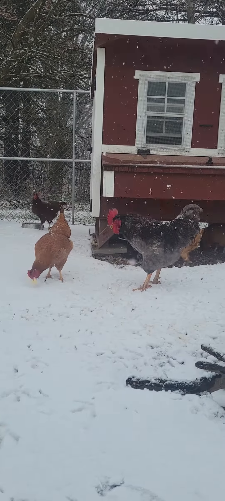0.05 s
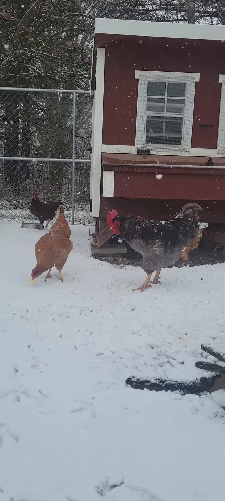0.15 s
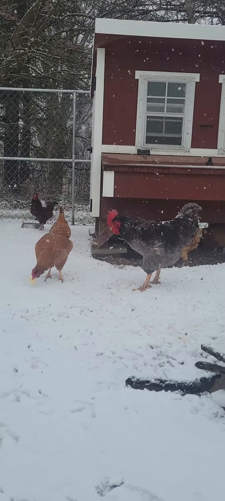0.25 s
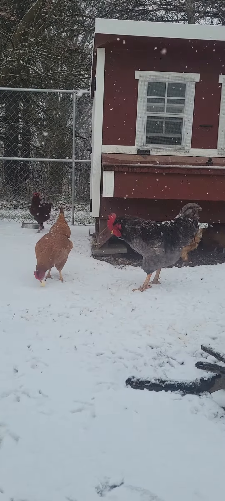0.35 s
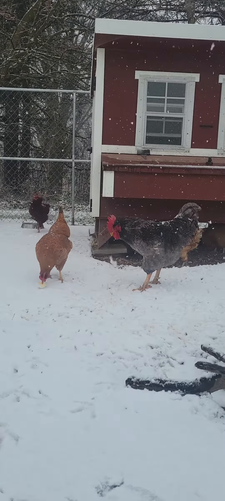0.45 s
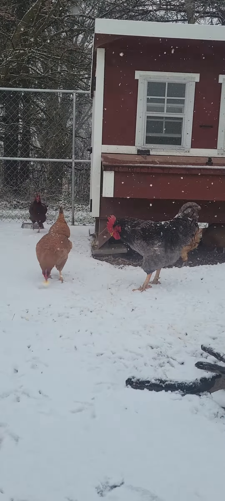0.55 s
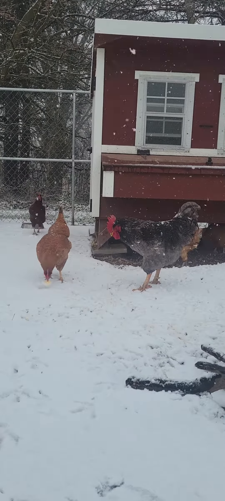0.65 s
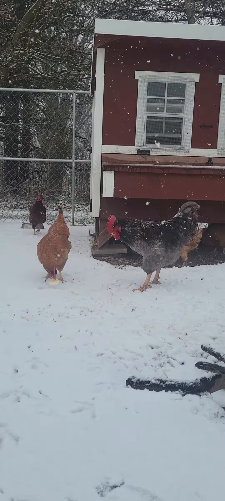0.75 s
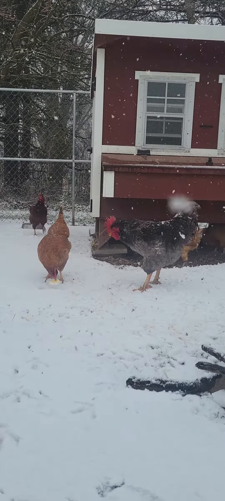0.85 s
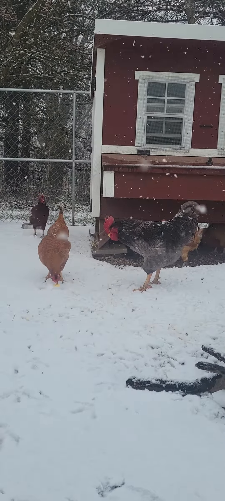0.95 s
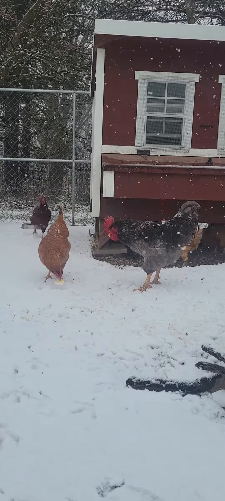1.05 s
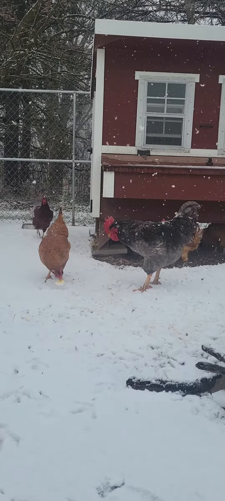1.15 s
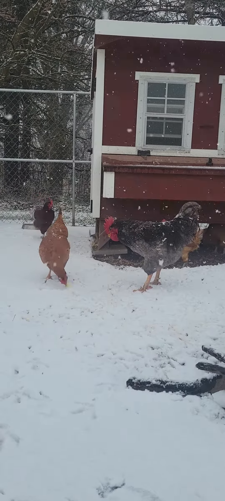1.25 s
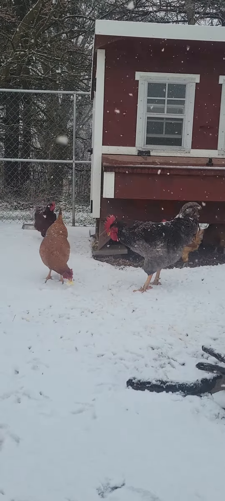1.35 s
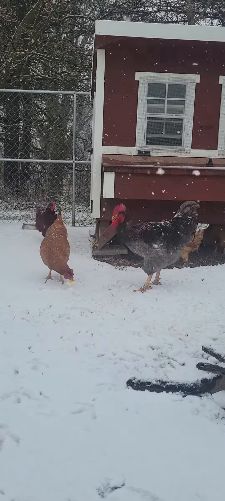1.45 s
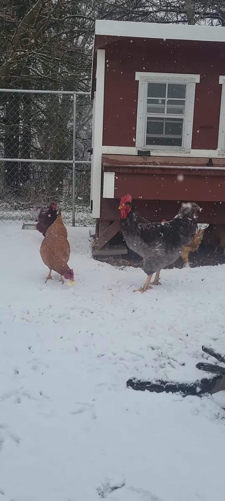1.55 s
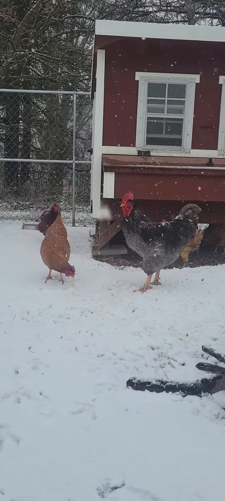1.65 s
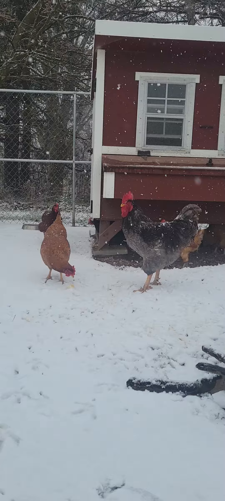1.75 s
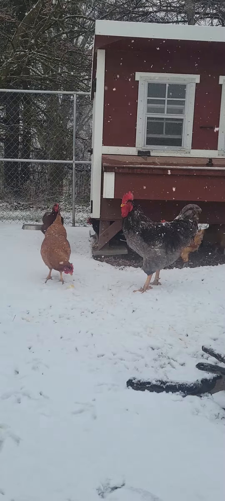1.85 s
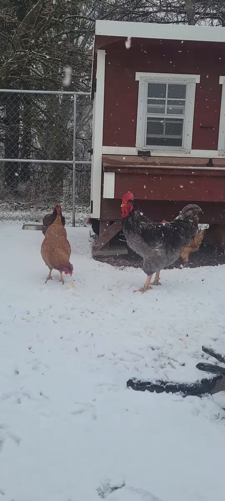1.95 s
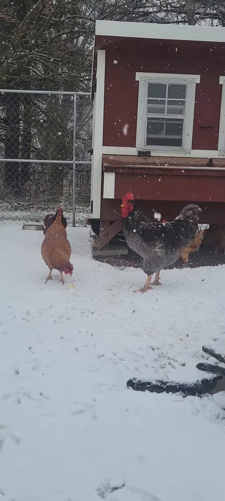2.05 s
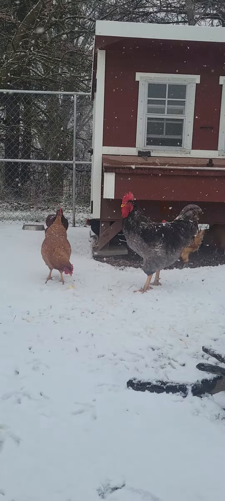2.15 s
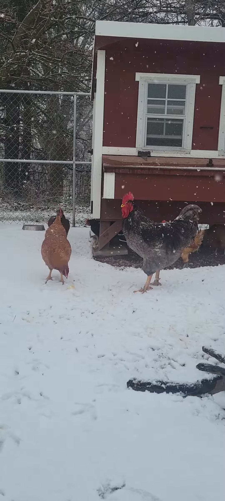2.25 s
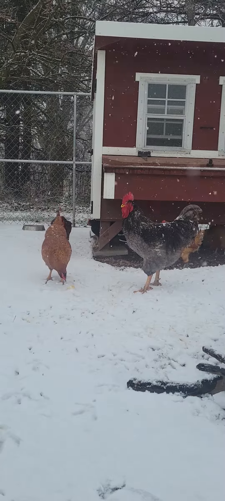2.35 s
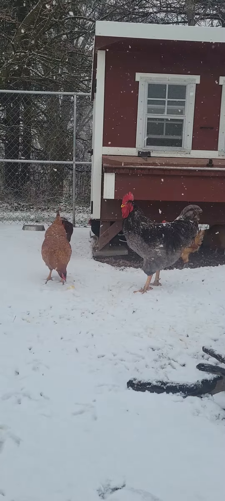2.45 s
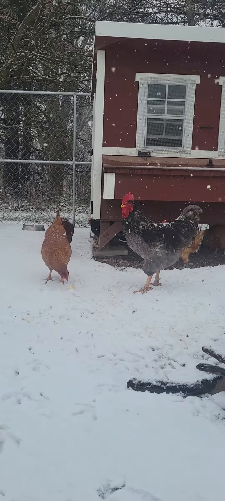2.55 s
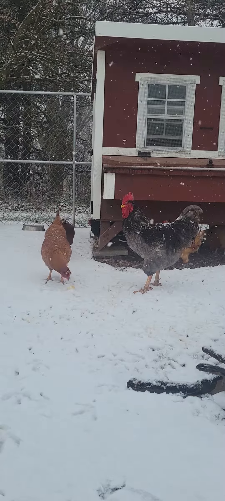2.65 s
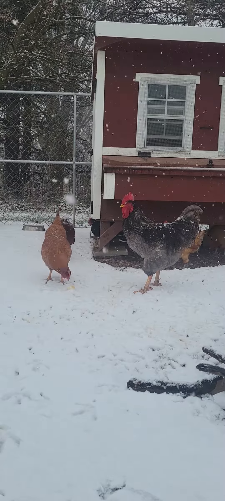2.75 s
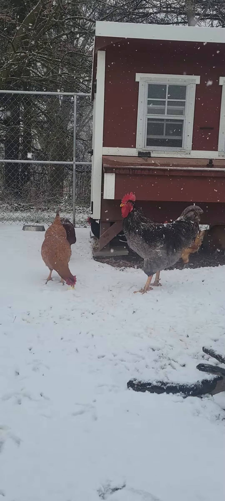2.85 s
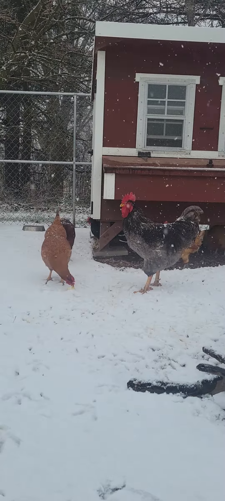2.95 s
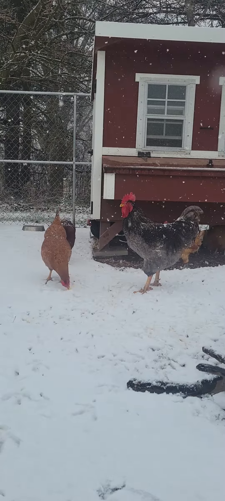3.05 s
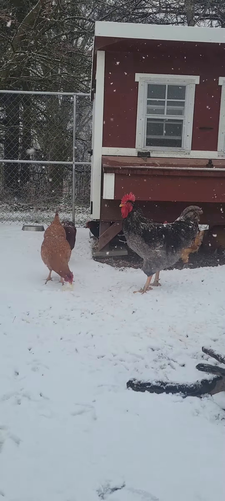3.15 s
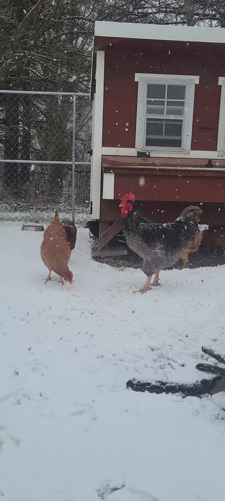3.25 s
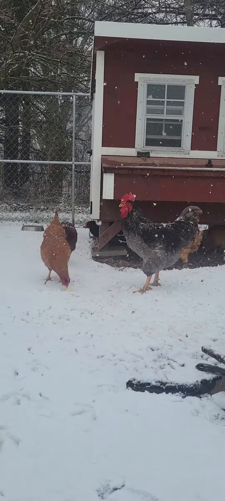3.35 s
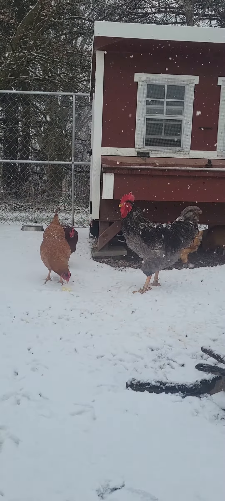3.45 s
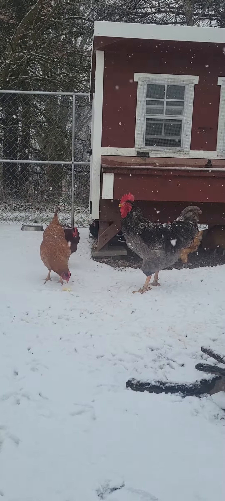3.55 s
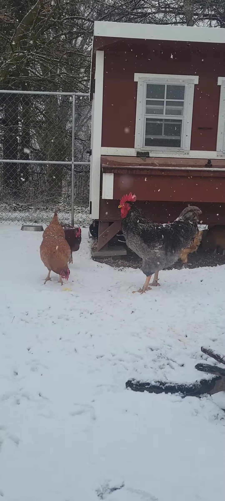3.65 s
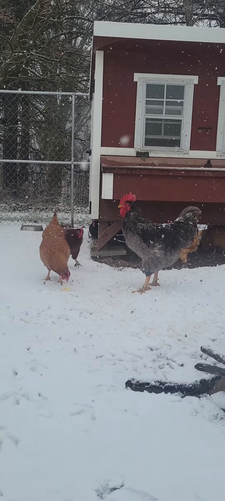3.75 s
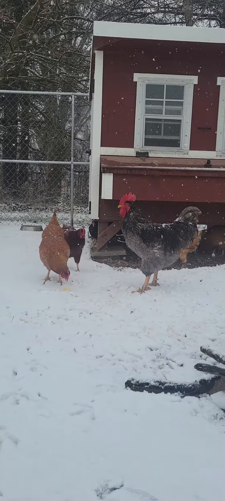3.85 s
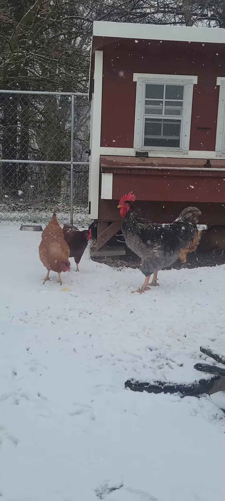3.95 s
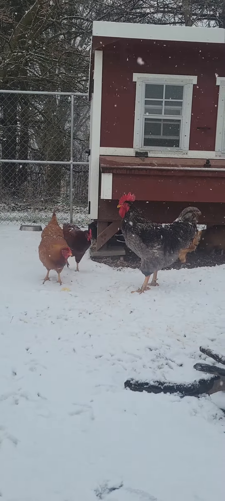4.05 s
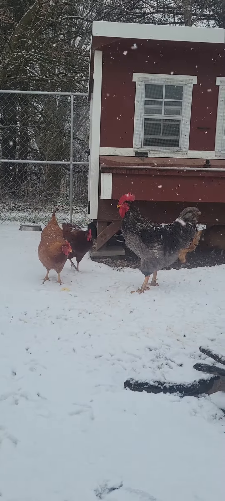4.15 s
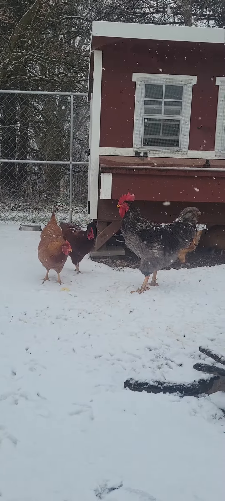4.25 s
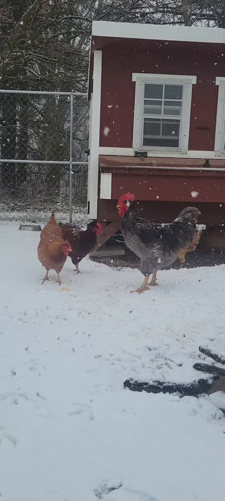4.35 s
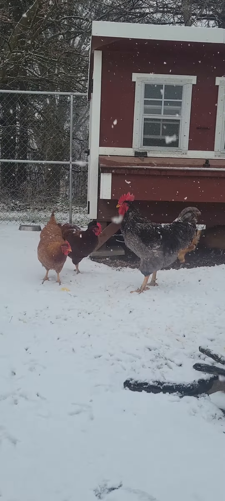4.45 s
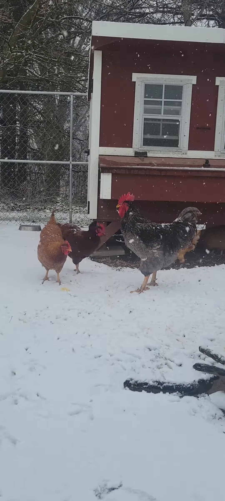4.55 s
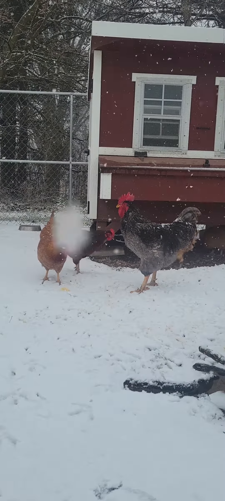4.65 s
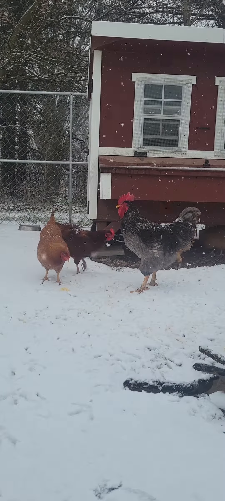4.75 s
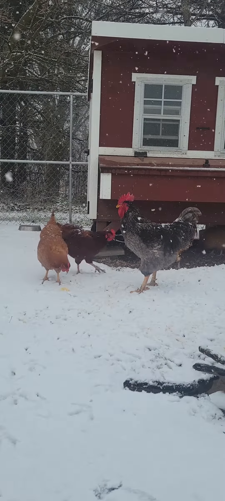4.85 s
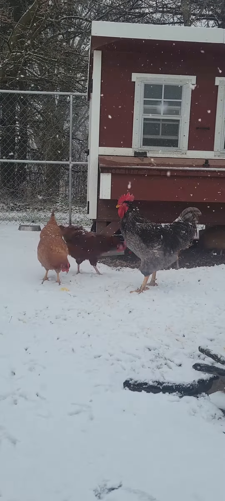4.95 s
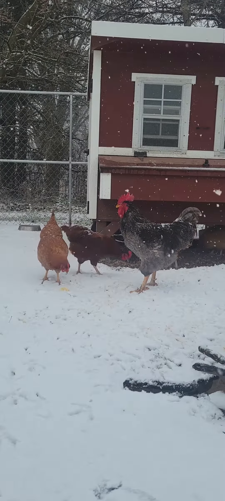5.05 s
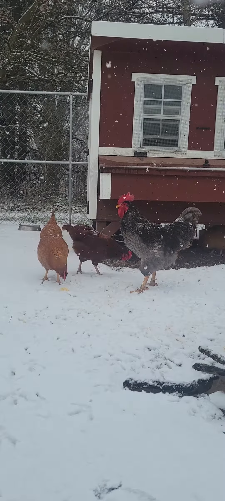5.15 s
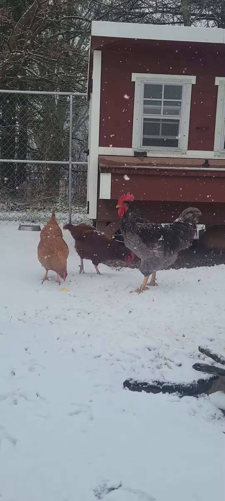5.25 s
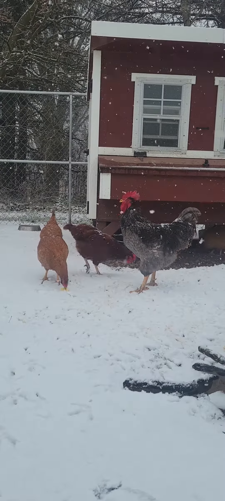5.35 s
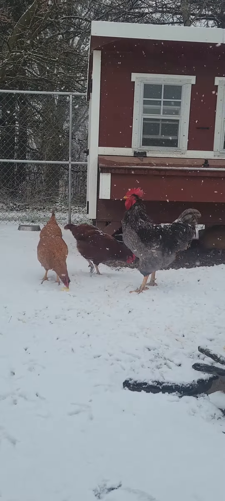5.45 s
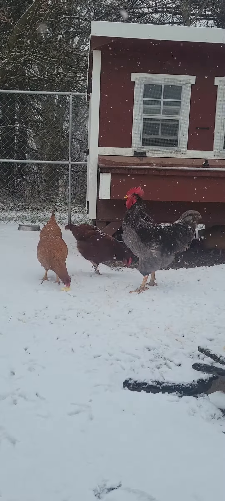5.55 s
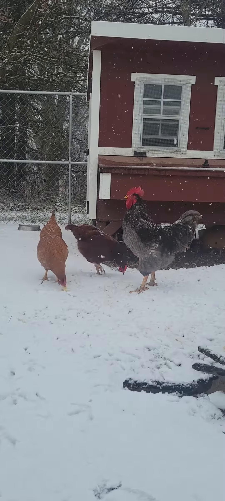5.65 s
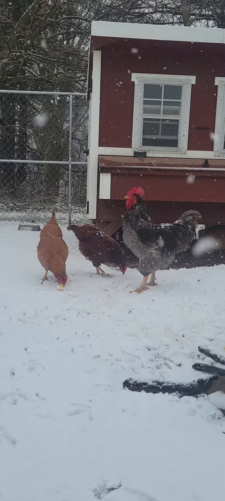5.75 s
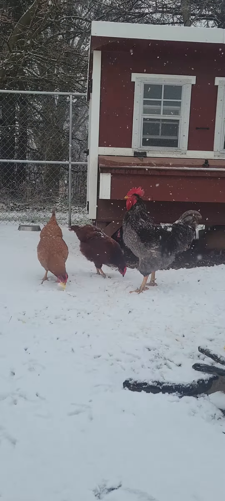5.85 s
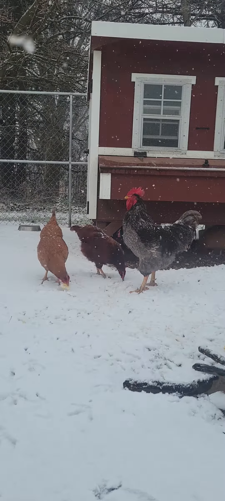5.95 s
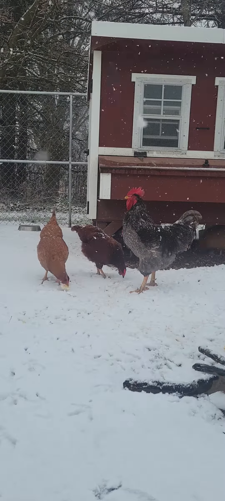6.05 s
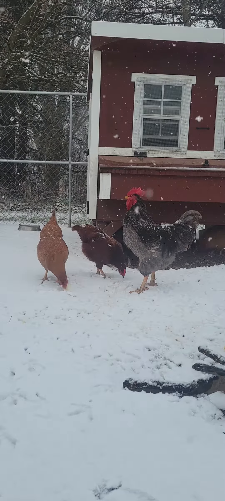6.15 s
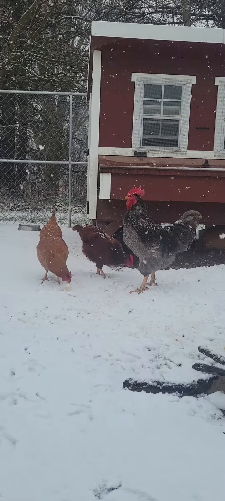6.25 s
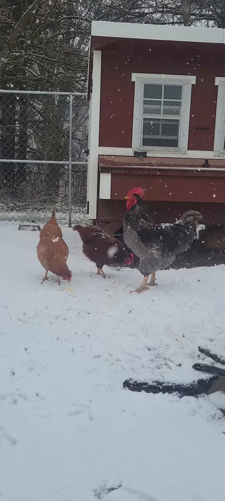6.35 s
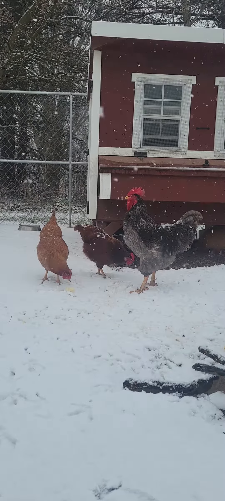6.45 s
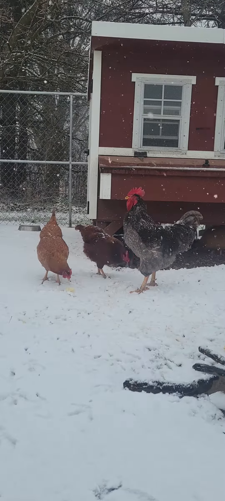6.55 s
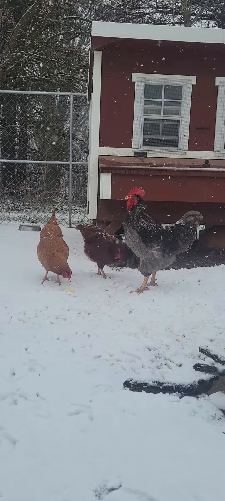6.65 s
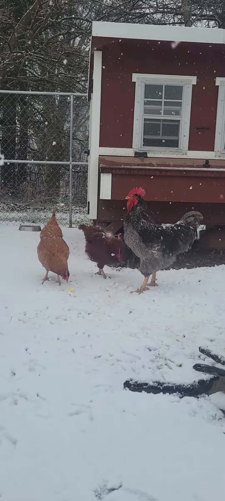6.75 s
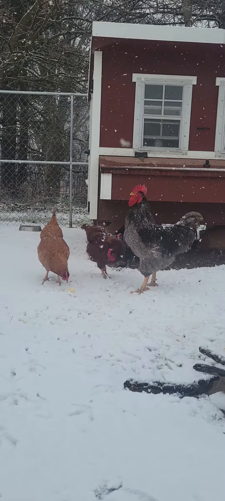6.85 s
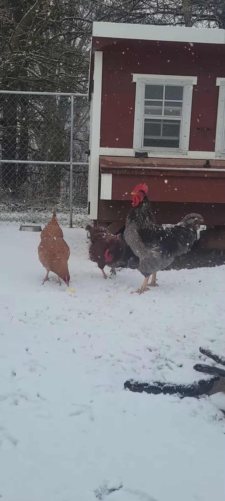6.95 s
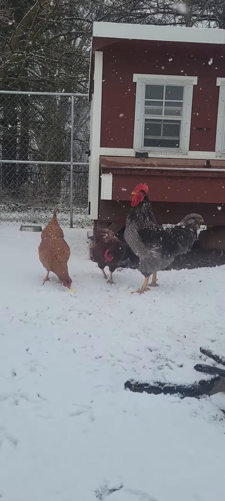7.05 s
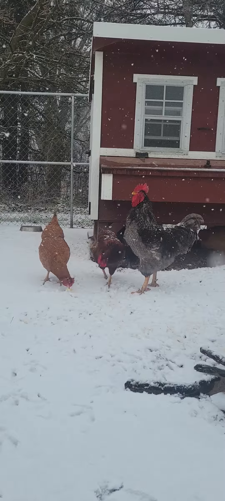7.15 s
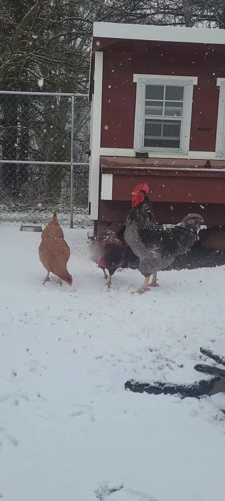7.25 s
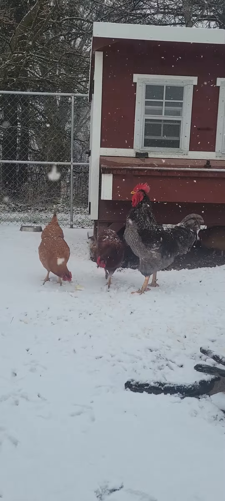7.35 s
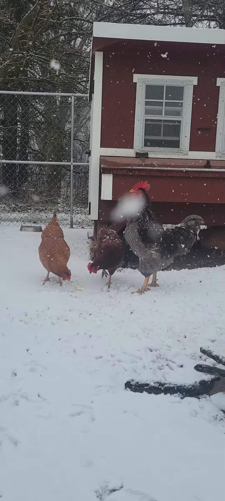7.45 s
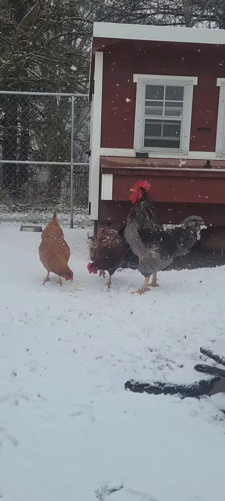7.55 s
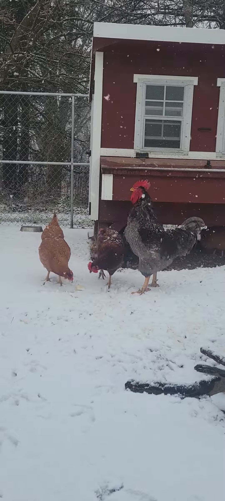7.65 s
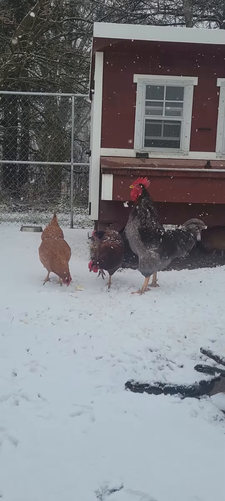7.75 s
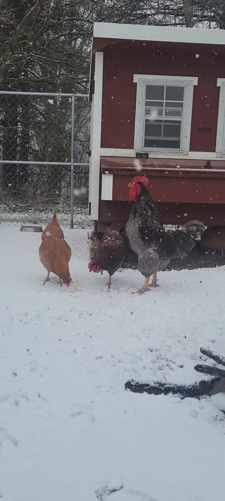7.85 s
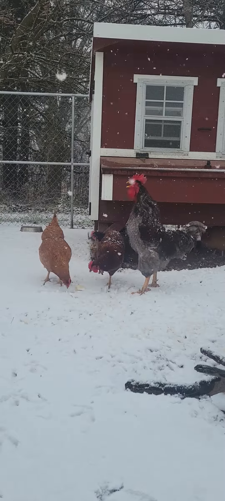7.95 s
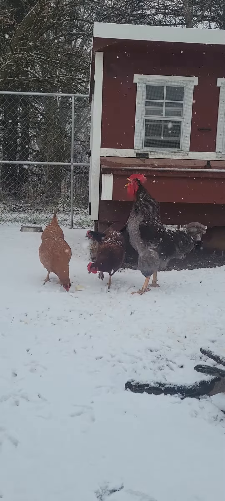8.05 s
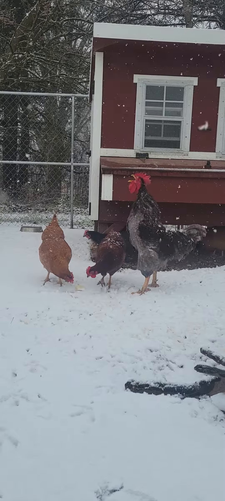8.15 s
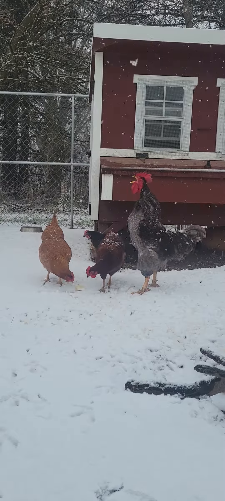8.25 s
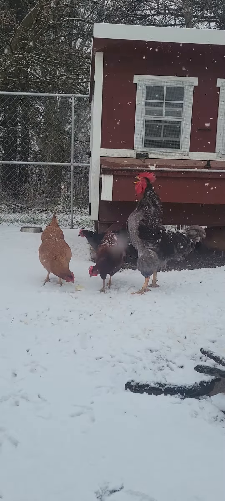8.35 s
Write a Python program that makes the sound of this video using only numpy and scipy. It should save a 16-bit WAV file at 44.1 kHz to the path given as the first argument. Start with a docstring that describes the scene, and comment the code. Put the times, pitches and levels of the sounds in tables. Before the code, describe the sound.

A quiet snowy back yard in stereo, with light low wind rumble and a faint airy hush throughout. From the start, hens nearby murmur soft, short, rounded clucks in loose runs, sinking slightly in pitch. Small birds give thin rising chips between 0.4 and 0.9 seconds, with a few more around 2 to 3. A dog far away in the woods barks hoarsely at about 0.9, 1.6, 3.5, 4.3 and 5.2 seconds, smeared by echo. Icy flakes tick crisply at random, sharpest around 2.9 and 3.3. A soft low bump hits the microphone case near 1.6, a fainter one near 4.8. A long, pure, falling bird whistle with echo sounds around 6.6 to 7.2. At 8.06 a close rooster erupts in a loud, rasping syllable about a quarter second long, jumping in pitch and clearing before stopping, with brief yard reflections.

```python
"""Snowy back yard: light wind rumbles under a faint hush (shaped noise) while icy flakes tick (noise bursts).
From the start hens murmur soft harmonic notes; small birds soon add near-pure rising chips, later whistles.
From 0.9 s a dog barks far off in the woods: hoarse pulses heard only through a scattered tail.
Two soft bumps on the microphone case follow: decaying sines.
At 8.06 s a rooster close by bursts into a rasping crow syllable: two coupled voices plus pulsed breath."""
import sys
import numpy as np
from scipy import signal
from scipy.fft import rfft, irfft
from scipy.io import wavfile
from scipy.ndimage import uniform_filter1d

SR = 44100
rng = np.random.default_rng(int(sys.argv[2]) if len(sys.argv) > 2 else 0)


def store_pcm(level_fs):
    """Save levels as 16-bit WAV."""
    pcm = np.round(np.clip(level_fs, -1, 1) * 32767).astype(np.int16)
    wavfile.write(sys.argv[1], SR, np.atleast_2d(pcm).T)


N = 370440


def amp(db):
    """Decibels to gain."""
    return 10 ** (np.asarray(db) / 20)


def unit_rms(x):
    """Scale to an rms of 1."""
    return x / np.sqrt(np.mean(x ** 2) + 1e-20)


def read(points, hz):
    """Interpolate a table on a log-frequency axis."""
    f, value = np.transpose(points)
    return np.interp(np.log(hz + 1), np.log(f + 1), value)


def add(mix, start_s, sound):
    """Mix a sound in from start_s, in place."""
    part = mix[..., max(round(start_s * SR), 0):][..., :sound.shape[-1]]
    part += sound[..., :part.shape[-1]]


def colour(x, points):
    """Filter by a dB spectrum."""
    count = x.shape[-1]
    gain = amp(read(points, np.fft.rfftfreq(count, 1 / SR)))
    return irfft(rfft(x) * gain, count)


def waver(count, rate_hz):
    """Smooth random curve of rms 1, rolled off above rate_hz."""
    hz = np.fft.rfftfreq(count, 1 / SR)
    lowpass = (hz > 0) / (1 + (hz / rate_hz) ** 4)
    return unit_rms(irfft(rfft(rng.standard_normal(count)) * lowpass, count))


def phase_of(hz):
    """Running phase of a pitch curve, radians."""
    return 2 * np.pi * np.cumsum(hz) / SR


def resonate(x, hz, width_hz):
    """Resonance with steep skirts: a triple complex pole."""
    r = np.exp(-np.pi * width_hz * 1.5 / SR)
    pole = r * np.exp(2j * np.pi * hz / SR)
    return signal.lfilter([(1 - r) ** 3], np.poly([pole] * 3), x).real


def scatter(x, t60_s, build_s, likeness):
    """Diffuse stereo tail from trees and walls: noise that builds up, then dies away."""
    t = np.arange(SR) / SR
    envelope = amp(-60 * t / t60_s) * (1 - np.exp(-t / build_s))
    shared, other = rng.standard_normal((2, SR)) * envelope
    c = np.clip(likeness, 0, 1)
    tail = np.array([shared, c * shared + np.sqrt(1 - c * c) * other])
    tail /= np.linalg.norm(shared)
    return signal.fftconvolve(x[None], tail, axes=1)[:, :len(x)]


# left-right likeness of diffuse noise: f/Hz, correlation [0-1]
PORT_LIKENESS = [(30, 0.71), (70, 0.99), (130, 0.98), (290, 0.74), (640, 0.59), (1410, 0.61), (3100, 0),
                 (15000, 0.08)]


def ambience(spectrum, level, patchy_db):
    """Partly shared noise at two ports, with drifting time-frequency patches, on a slow level curve."""
    frames, hz = N // 512 + 5, np.fft.rfftfreq(2048, 1 / SR)
    a, b, c, d, patches = rng.standard_normal((5, frames, len(hz)))
    patches = uniform_filter1d(patches, size=8, axis=0)
    patches = unit_rms(uniform_filter1d(patches, size=12, axis=1))
    same = np.clip(read(PORT_LIKENESS, hz), -1, 1)
    left = a + 1j * b
    right = same * left + np.sqrt(1 - same ** 2) * (c + 1j * d)
    z = np.array([left, right]) * amp(read(spectrum, hz) + patchy_db * patches)
    noise = signal.istft(z.transpose(0, 2, 1), nperseg=2048, noverlap=1536)[1][:, :N]
    level_db = np.interp(np.arange(N) / SR, *np.transpose(level))
    return unit_rms(noise) * amp(level_db)


# wind spectrum before final colour: f/Hz, relative density/dB per Hz
WIND_SPECTRUM = [(12, -50), (20, -14.5), (60, -1), (97, 0), (164, -7), (285, -22), (400, -27.5),
                 (520, -45.5), (880, -120)]
# wind level before final colour: t/s, level/dB
WIND_LEVEL = [(0, -58), (3.9, -58), (7.2, -59.5), (7.7, -61), (8.4, -60.5)]


def wind():
    """Low rumble: noise with its weight in the bass."""
    rumble = ambience(WIND_SPECTRUM, WIND_LEVEL, patchy_db=1.5)
    return colour(rumble, [(25, -6.5), (60, .5), (100, 0.0), (300, 0)])


# hush spectrum before final colour: f/Hz, relative density/dB per Hz
AIR_SPECTRUM = [(150, -34), (250, -10), (386, -17), (510, -6.5), (802, -14), (1260, -5.5), (1760, -21.5),
                (2960, -22), (4340, -29), (5830, -26.5), (7060, -21.5), (7700, -25), (8260, -42.5),
                (12800, -32), (16000, -30.5)]
# slow swell of the hush: t/s, relative level/dB
AIR_SWELL = [(0, 0), (2, -1.5), (7.3, 0.5), (8, -3.5)]


def air(gain_db=-69.5):
    """Far hush of the yard: broadband noise."""
    hush = ambience(AIR_SPECTRUM, AIR_SWELL, patchy_db=2.5)
    hush = colour(hush, [(1300, 0.39), (2400, -2.6), (4000, -0.94), (10000, -0.81), (14000, 1.5)])
    return amp(gain_db) * hush


# largest icy flakes: t/s, level before common gain/dB, treble tilt/dB (+ at 13 kHz, - at 3.5 kHz)
TICKS = [(0.5153, -47.5, -3.5), (0.9245, -37, -4), (1.2321, -49, 0.5), (1.5552, -45, -1.5),
         (1.8167, -56, 6), (2.0782, -58.5, -0.5), (2.8639, -45, 0), (2.89, -33.5, 4.5), (3.047, -43.5, 6.5),
         (3.286, -45.5, 7), (3.303, -44, 8), (3.3223, -42, 6), (3.3378, -31, 2.5), (3.3445, -37, -2.5),
         (3.3478, -43, -6), (5.3685, -44.5, 4), (5.4345, -50, 1.5), (5.4675, -40, 1.5), (5.5393, -48, -1),
         (5.5672, -47.5, 0), (5.883, -49.5, 1.5), (7.077, -40.5, -4), (7.2002, -40.5, 1)]
# spectrum common to all ticks: f/Hz, gain/dB
TICK_COLOUR = [(500, -22), (1800, -15.5), (3000, -6), (5000, -1), (6800, -5), (8200, 0.5), (10500, -7),
               (13000, -3.5), (16000, 3.5)]


def flakes(gain_db=1.0, snap_s=0.0011, crumble_s=0.011, crumble_db=-15,
           faint_per_s=8, faint_db=-72, faint_spread_db=4, faint_tilt_db=-2.5):
    """Each icy flake snaps and crumbles as a two-stage noise decay; fainter ones land at random."""
    out, t = np.zeros((2, N)), np.arange(2048) / SR
    decay = np.exp(-t / snap_s) + amp(crumble_db) * np.exp(-t / crumble_s)
    decay *= 1 - np.exp(-t * 2500)  # onset
    faint = []
    for when, rarity in rng.random((int(faint_per_s * N / SR), 2)):
        level_db = faint_db - faint_spread_db * np.log(rarity + 0.034)
        faint.append((when * N / SR, level_db, faint_tilt_db))
    for s, db, tilt_db in TICKS + faint:
        snap = colour(rng.standard_normal((2, len(t))), TICK_COLOUR)
        snap = unit_rms(colour(snap, [(3500, -tilt_db), (13000, tilt_db)]))
        add(out, s, amp(db + gain_db) * snap * decay * amp([[-1.5], [1.5]]))
    return out


def note(hz, length_s, fall, arch):
    """Phase and envelope of one short arched note; fall and arch are shares of the pitch."""
    u = np.linspace(-1, 1, int(length_s * SR))
    pitch_hz = hz * (1 - fall * u / 2 - arch * u ** 2 + 0.0055 * waver(len(u), 120))
    return phase_of(pitch_hz), np.sqrt(2) * np.cos(np.pi * u / 2)


# clearest hen notes: middle t/s, f/Hz, level/dB, third harmonic/dB re level
CLUCKS = [(.06, 636, -68.5, -23), (.21, 718, -72.5, -30), (.42, 697, -76, -13), (1.32, 720, -67, -18),
          (2.08, 629, -72, -19), (2.24, 708, -74.5, -1), (2.40, 695, -75.5, -26), (2.52, 618, -74, -38),
          (2.86, 698, -73.5, -23), (3.00, 615, -74, -30), (3.16, 696, -69, -12), (3.26, 686, -75, -11),
          (4.66, 624, -67.5, -10), (4.77, 704, -73, -7), (4.96, 602, -74, -26), (5.17, 677, -72, -6.5),
          (6.08, 680, -75, -11), (6.48, 671, -74, -4), (6.68, 593, -66, -15), (6.90, 667, -76, -4),
          (7.32, 665, -81, 1), (7.41, 655, -72.5, -21), (7.85, 655, -76, -12)]


def hens(second_db=4.5, fundamental_db=-16, wet_db=-4, pitch_spread=.015, level_spread_db=2):
    """Closed-beak notes, clear ones over a faint run: the throat favours harmonics 2 and 3."""
    note_s, murmur_gap_s = 0.07, .42
    murmur_hz, murmur_sink_hz_per_s = 726, 7.2  # pitch sinks as the hens settle
    murmur_db, murmur_third_db = -78, -9
    out, notes = np.zeros(N), list(CLUCKS)
    chances = rng.standard_normal((int(N / SR / murmur_gap_s), 3))
    for beat, (late, sharp, loud) in enumerate(chances):
        s = (beat + 1 + .2 * late) * murmur_gap_s  # loose rhythm
        hz = (murmur_hz - murmur_sink_hz_per_s * s) * (1 + pitch_spread * sharp)
        notes.append((s, hz, murmur_db + level_spread_db * loud, murmur_third_db))
    for s, hz, db, third_db in notes:
        phase, swell = note(hz, note_s, fall=0.04, arch=0.04)
        tone = amp(fundamental_db) * np.sin(phase)
        tone += amp(second_db) * np.sin(2 * phase)
        tone += amp(third_db) * np.sin(3 * phase)
        add(out, s - note_s / 2, amp(db) * swell * tone)
    return out + amp(wet_db) * scatter(out, t60_s=0.27, build_s=.01, likeness=.4)


# rising chips: middle t/s, f/Hz, level/dB
CHIPS = [(0.401, 3260, -73), (.47, 2860, -76), (.55, 3180, -73), (.733, 3130, -76.5), (0.894, 3230, -71),
         (2.13, 2930, -78.5), (2.929, 3080, -77)]
# long whistles: start t/s, length/s, f/Hz before glide, level/dB
WHISTLES = [(1.568, .1, 3670, -83), (6.613, 0.43, 3573, -68), (6.898, 0.32, 3180, -77.5)]


def songbirds(chip_wet_db=-5, whistle_wet_db=-6):
    """Nearly pure notes from the trees: quick chips nearby, long whistles echoing from farther off."""
    chip_s, chip_rise, chip_arch = .033, .06, .025  # rise, arch: shares of pitch
    scoop, scoop_s, sag_per_s = .09, .028, .23  # scoop, sag: shares of pitch
    chips, whistles = np.zeros((2, N))
    for s, hz, db in CHIPS:
        phase, swell = note(hz, chip_s, -chip_rise, chip_arch)
        add(chips, s - chip_s / 2, amp(db) * swell * np.sin(phase))
    for s, length_s, hz, db in WHISTLES:
        t = np.arange(0, length_s, 1 / SR)
        glide = 1 - scoop * np.exp(-t / scoop_s) - sag_per_s * t + .004 * waver(len(t), 120)
        swell = np.sin(np.pi * t / length_s)
        add(whistles, s, amp(db) * swell * np.sin(phase_of(hz * glide)))
    chip_tail = scatter(chips, t60_s=0.26, build_s=0.0088, likeness=0.23)
    whistle_tail = scatter(whistles, t60_s=1.0, build_s=.03, likeness=0.48)
    return chips + amp(chip_wet_db) * chip_tail + whistles + amp(whistle_wet_db) * whistle_tail


# barks: start t/s, level/dB, f/Hz, mouth resonance f/Hz, length/s, chest tone/dB re level, treble/dB
BARKS = [(0.943, -54, 501.7, 1040, 0.29, -19, -7), (1.632, -57, 503.2, 880, .24, -4, -7.5),
         (3.542, -58, 495.4, 770, 0.24, -2, -2), (4.308, -55, 519, 910, 0.24, -11.5, -5),
         (5.215, -55.5, 525, 1420, 0.23, -8, -5)]
# spectrum common to all barks: f/Hz, gain/dB
BARK_COLOUR = [(250, -40), (420, -45), (510, 1), (660, -19), (830, 1.5), (1400, 2), (1750, -12),
               (2100, -15.5), (2700, -24), (3150, -13), (4500, -54)]


def dog(fall=0.1, arch=0.81, rough=.58):
    """Hoarse, falling barks over a clear chest tone, heard only as their long scatter through the woods."""
    out = np.zeros(N)
    for s, db, hz, mouth_hz, length_s, chest_db, treble_db in BARKS:
        u = np.linspace(0, 1, int(length_s * SR))
        bend = 1 - fall * (u - .5) - arch * (u - .5) ** 2
        phase = phase_of(hz * (bend + 0.035 * waver(len(u), 140)))
        folds = unit_rms(sum(np.cos(k * phase) for k in range(2, 9)))
        puffs = 2 * rng.standard_normal(len(u)) * (1 + np.cos(phase))
        bark = colour((1 - rough) * folds + rough * puffs, BARK_COLOUR)
        mouth = [(mouth_hz - 300, 0), (mouth_hz, 7), (mouth_hz + 300, 0), (3000, treble_db)]
        bark = unit_rms(colour(bark, mouth))
        # the chest tone swells as the mouth closes
        chest_phase = phase_of(hz * (1 + 0.053 * waver(len(u), 71)))
        chest = amp(chest_db) * 2 * np.sqrt(u) * np.cos(chest_phase)
        add(out, s, amp(db) * (bark + chest) * signal.windows.tukey(len(u), .3))
    return scatter(out, t60_s=1.065, build_s=0.00092, likeness=0.62)


# bumps on the microphone case: t/s, level/dB, push f/Hz, push t60/s, knock/dB re level
BUMPS = [(1.554, -30, 90, 0.04, -24), (4.751, -44.5, 118, 0.094, -42)]
# modes of the case: f/Hz, level/dB re knock, t60/s
CASE_MODES = [(270.4, -1, .025), (650, -3, 0.01), (1040, 6, 0.026), (1400, 3.5, 0.044)]


def bumps():
    """A low decaying push on the case, then a short knock of its modes 1 ms later."""
    out, t = np.zeros(N), np.arange(SR // 8) / SR
    for s, db, hz, t60_s, knock_db in BUMPS:
        push = -np.sin(2 * np.pi * hz * t) * amp(-60 * t / t60_s)
        knock = sum(amp(mode_db - 60 * t / mode_t60_s) * np.sin(2 * np.pi * mode_hz * t)
                    for mode_hz, mode_db, mode_t60_s in CASE_MODES)
        add(out, s, amp(db) * push)
        add(out, s + 0.001, amp(db + knock_db) * knock)
    return out


CROW_START_S, CROW_RELEASE_S, RELEASE_DB_PER_S = 8.063, 8.295, 1597
# lead voice's leaps towards the second: middle t/s, length/s, target f/Hz before sag
LEAPS = [(8.192, .014, 1431), (8.246, 0.00927, 1236), (8.297, .056, 1408)]


def gesture(t, ramp_s=0.00194):
    """Pitch and level of both voices, and rasp amount [0-1], at t s into the syllable."""
    clock_s = CROW_START_S + t
    # lead drops from a squeak, then climbs to its held pitch
    lead_hz, squeak_hz, squeak_s, climb_hz, climb_s = 1058, 646.5, 0.003016, 322.6, .047
    held_hz = lead_hz - climb_hz * np.exp(-t / climb_s) + squeak_hz * np.exp(-t / squeak_s)
    leap_hz = 0
    for middle_s, length_s, target_hz in LEAPS:
        outside_s = abs(clock_s - middle_s) - length_s / 2
        leap_hz = leap_hz + (target_hz - held_hz) / (1 + np.exp(outside_s / ramp_s))
    # second joins late and sharp, settles on the throat's resonance
    settled_hz, sharp_hz, settle_s, late_s = 1392, 174.6, 0.02762, 0.0077
    second_hz = settled_hz + sharp_hz * np.exp(-(t / settle_s) ** 4)
    joining_db = -20 * np.log10(1 + np.exp((late_s - t) / ramp_s))
    # as the voices lock, the lead gains and the rasp clears
    lock = np.clip(leap_hz / (settled_hz - lead_hz), 0, 1) ** 2
    lock_gain_db, lock_rasp_loss = 4, .78
    # last push of air, after which pitch and level sag and rasp returns
    push_s, push_width_s, push_db = 8.278, .0055, 10
    push = np.exp(-((clock_s - push_s) / push_width_s) ** 2 / 2)
    spent_s = np.maximum(clock_s - push_s, 0)
    sag_hz_per_s, sag_db_per_s, rasp_return_per_s = 3450, 172, 17
    release_db = -sag_db_per_s * spent_s
    release_db -= RELEASE_DB_PER_S * np.maximum(clock_s - CROW_RELEASE_S, 0)
    attack_db = 20 * np.log10(np.clip(t / 0.027, 1e-3, 1))  # 27 ms linear attack
    # lead grows as pressure builds; second gives way
    lead_db = attack_db + release_db - 25.5 + 17.5 * t + lock_gain_db * lock + push_db * push
    second_db = joining_db + release_db - 21.5 - 34 * t
    rasp = (1.1 - 2 * t) * (1 - lock_rasp_loss * lock) * (1 - push / 2)
    rasp = np.clip(rasp + rasp_return_per_s * spent_s, 0, 1)
    return held_hz + leap_hz - sag_hz_per_s * spent_s, lead_db, second_hz, second_db, rasp


# lead overtones as the throat passes them: f/Hz, level/dB re lead
OVERTONES = [(1500, -17), (1800, -17), (1910, 5), (2000, -8.5), (2100, -5.5), (2300, -23.5), (2650, -38.5),
             (2800, -26), (3300, -39.5), (3950, -17.5), (4200, -26.5), (4950, -27.5), (5500, -64),
             (9000, -60)]
# combination tones: multiple of lead, multiple of second, level at full rasp/dB re lead
COUPLED = [(-1, 1, -7), (2, -1, -14), (-1, 2, -18), (3, -1, -16)]
# broad turbulence of the rasp: f/Hz, relative density/dB per Hz
RASP = [(150, -27), (400, -13.5), (600, -6.5), (780, -2.5), (1200, -3.5), (1650, -27), (2100, -12.5),
        (2550, -14.5), (3300, -9), (5100, -7.5), (5800, -26), (8000, -31), (9300, -33), (11000, -24.5),
        (16000, -33.5)]
# resonances of windpipe and open beak: f/Hz, width parameter/Hz, level/dB
THROAT = [(616, 77, -9), (1382, 110, -5), (1896, 136, -4), (3880, 680, -26), (4790, 120, -21.5),
          (6370, 350, -30.5)]


def syrinx(lead_jitter=0.037, second_jitter=0.05, flutter=0.77, rasp_db=-11, overtone_jitter_rad=0.215):
    """Two coupled membranes: their tones mix into a rasp, which clears as the lead leaps up."""
    t = np.arange(0, CROW_RELEASE_S - CROW_START_S + 30 / RELEASE_DB_PER_S, 1 / SR)
    lead_hz, lead_db, second_hz, second_db, rasp = gesture(t)
    count = len(t)
    lead = phase_of(lead_hz * (1 + lead_jitter * rasp * waver(count, 280)))
    second = phase_of(second_hz * (1 + second_jitter * waver(count, 208)))
    second_gain = amp(second_db - lead_db) * (1 + flutter * waver(count, 150))
    tones = np.sin(lead) + second_gain * np.sin(second)
    for k in range(2, 7):
        jittered = lead + overtone_jitter_rad * rasp * waver(count, 170)
        tones += amp(read(OVERTONES, k * lead_hz)) * np.sin(k * jittered)
    for m, n, db in COUPLED:
        # the small beak radiates no bass
        radiated = np.clip((m * lead_hz + n * second_hz - 450) / 120, 0, 1)
        tones += amp(db) * rasp * radiated * np.sin(round(m) * lead + round(n) * second)
    # air escapes in puffs at the beat between the voices and rings the throat
    puffs = rng.standard_normal(count) * (1 + .8 * np.cos(second - lead))
    hoarse = amp(rasp_db) * unit_rms(colour(puffs, RASP))
    for hz, width_hz, db in THROAT:
        hoarse += amp(db) * unit_rms(resonate(puffs, hz, width_hz))
    return amp(lead_db) * (np.sqrt(2) * tones + rasp * hoarse) * signal.windows.tukey(count, .02)


# direct sound at the two ports: f/Hz, left-right level/dB
PORT_BALANCE = [(200, 0), (400, -4), (620, 4.5), (800, 3), (1020, 2.5), (1380, -6), (1550, -9), (1900, 14),
                (2200, -2.5), (2600, -1), (4000, -2.5), (15000, -1)]
# direct sound at the two ports: f/Hz, left phase lead/rad
PORT_PHASE = [(200, -0.5), (600, -1.33), (1030, 0.27), (1400, 0.5), (1640, 3), (2070, 1.4), (3880, 1.86),
              (5430, 2), (9000, 1.8), (15000, 0.9)]
# echoes off coop, fence and house: delay t/s, left level/dB, right level/dB
ECHOES = [(.0131, -19.5, -14.5), (.035, -31, -19), (.049, -22, -25), (.060, -40.5, -37), (.078, -33, -36),
          (.120, -39, -40)]


def rooster(yard_db=-26):
    """The crow reaches the two ports directly, then off the walls and the yard."""
    voice = syrinx()
    voice = np.pad(voice, (0, SR - len(voice)))
    voice = colour(voice, [(380, -7.0), (520, 0)])  # little bass leaves the beak
    hz = np.fft.rfftfreq(SR, 1 / SR)
    half = amp(read(PORT_BALANCE, hz) / 2) * np.exp(1j * read(PORT_PHASE, hz) / 2)
    paths = np.array([half, 1 / half])
    for delay_s, left_db, right_db in ECHOES:
        paths += amp([[left_db], [right_db]]) * np.exp(-2j * np.pi * hz * delay_s)
    direct_and_echoes = irfft(paths * rfft(voice), SR)
    yard = colour(voice, [(700, -9), (1300, 10.5), (2500, 12)])
    yard = scatter(yard, t60_s=0.33, build_s=0.0032, likeness=.2)
    out = np.zeros((2, N))
    add(out, CROW_START_S, direct_and_echoes + amp(yard_db) * yard)
    return out


def scene():
    """Sum of wind, hush, flakes, birds, dog, bumps and rooster."""
    return wind() + air() + flakes() + hens() + songbirds() + dog() + bumps() + rooster()


def record(dry, edge_hz=16000):
    """The recorder's band limit: linear-phase low-pass."""
    lowpass = signal.firwin(511, edge_hz, window=("kaiser", 9), fs=SR)
    return signal.oaconvolve(dry, lowpass[None], "same")


dry = scene()
out = record(dry)
store_pcm(out)
```